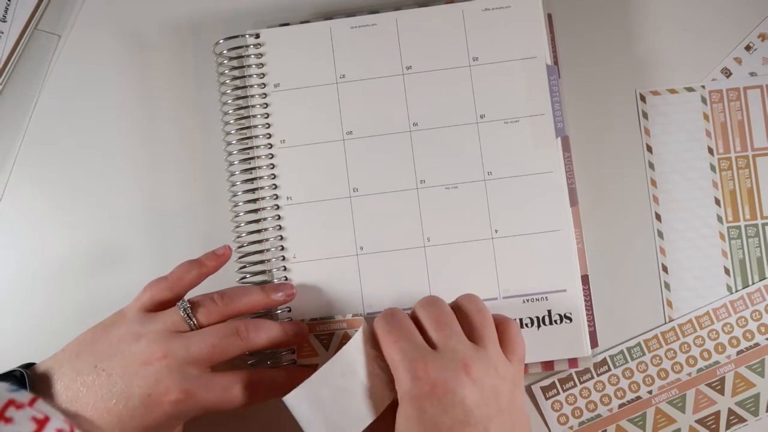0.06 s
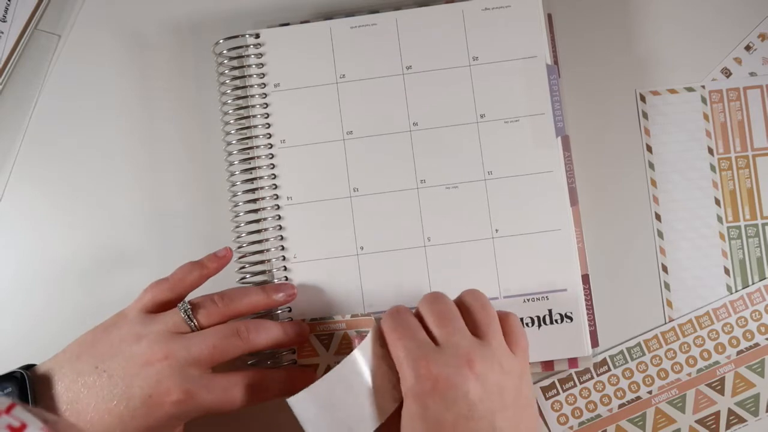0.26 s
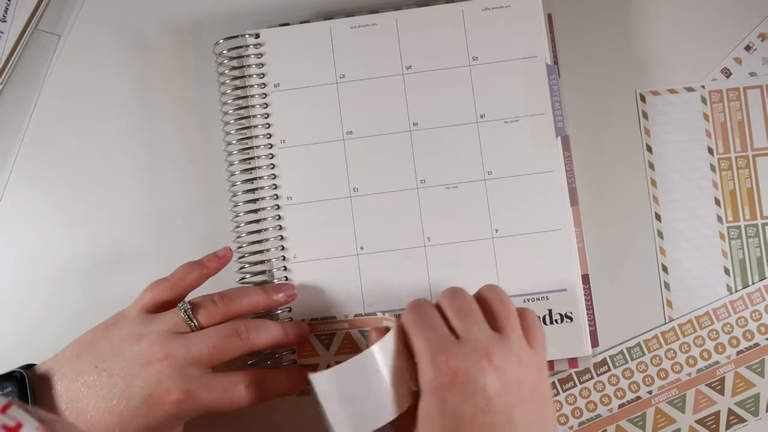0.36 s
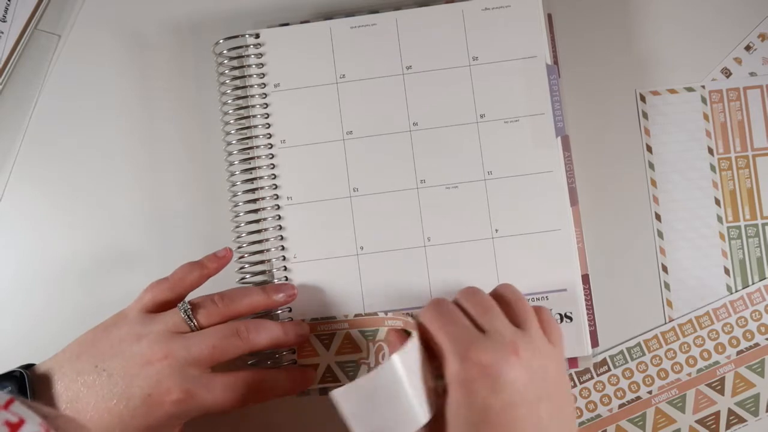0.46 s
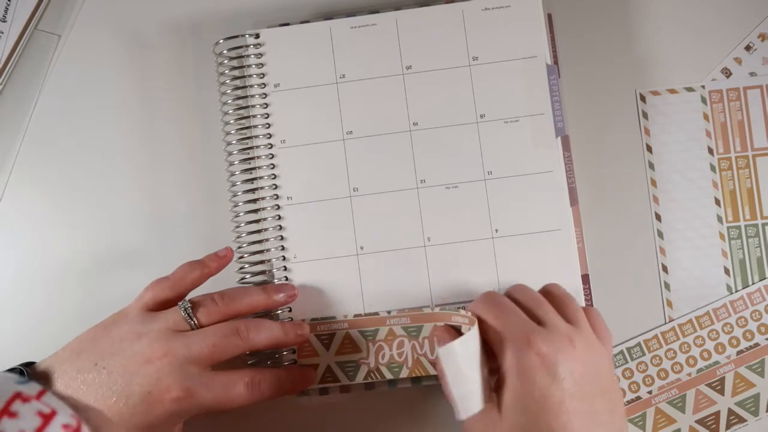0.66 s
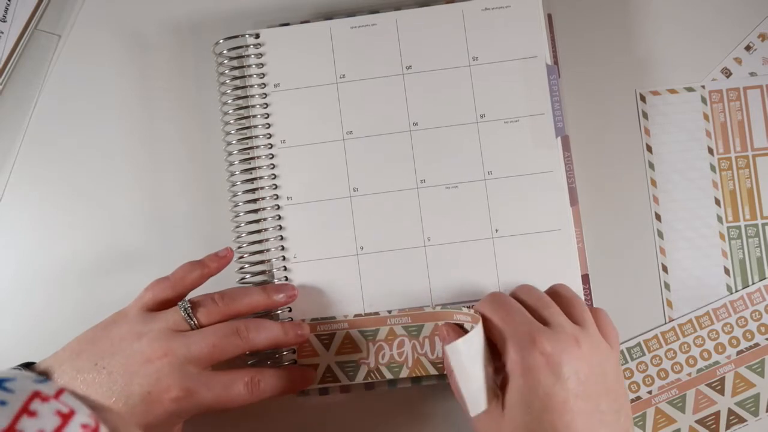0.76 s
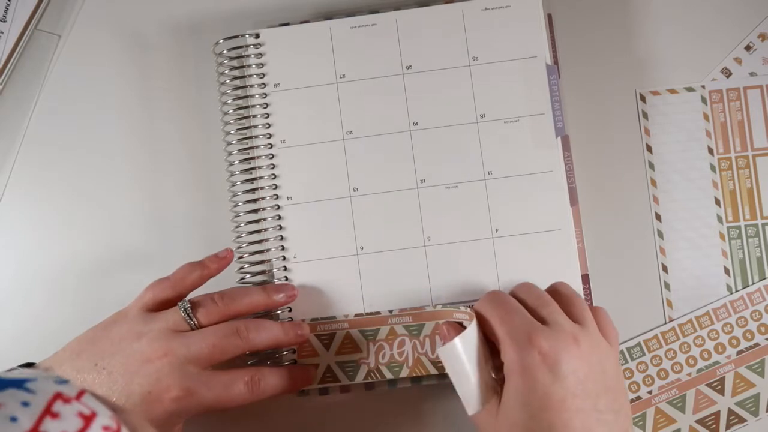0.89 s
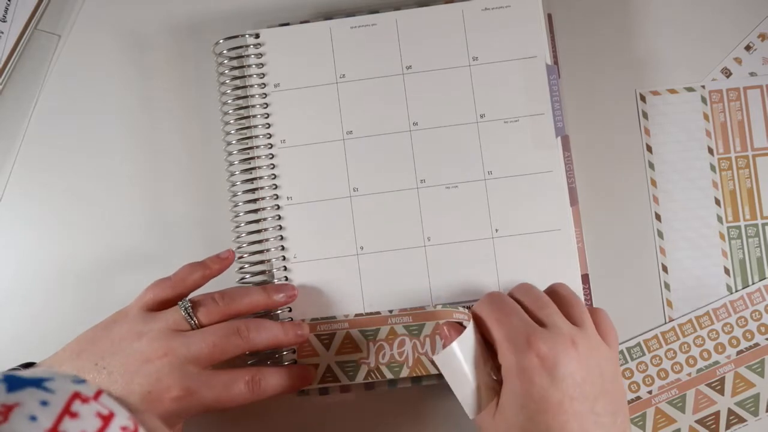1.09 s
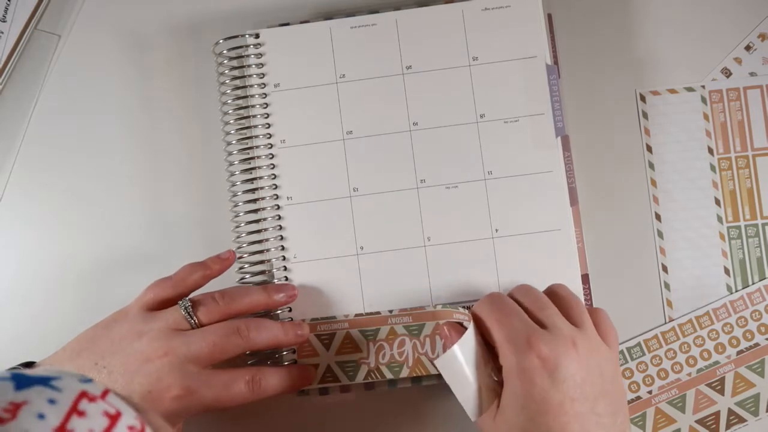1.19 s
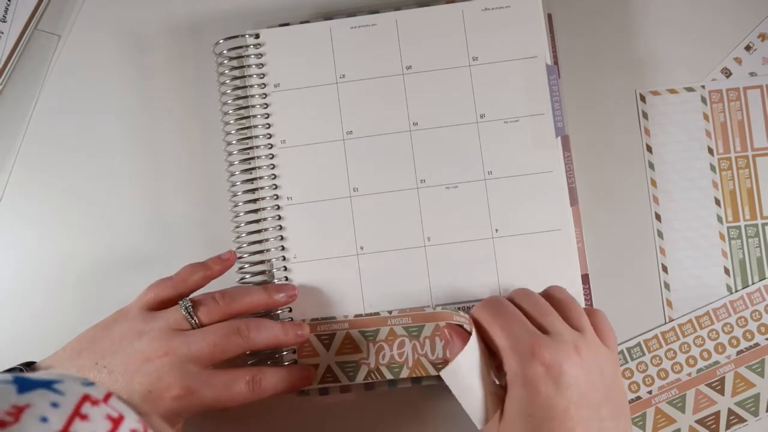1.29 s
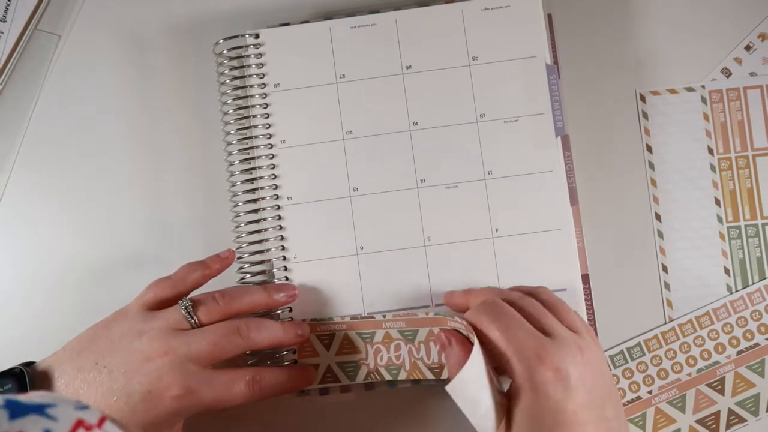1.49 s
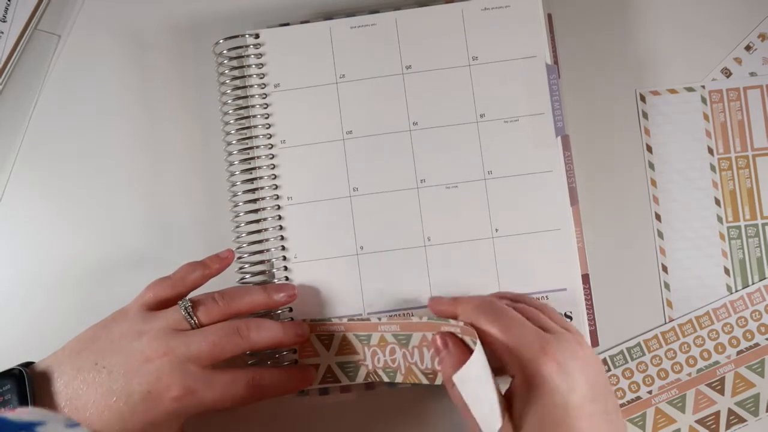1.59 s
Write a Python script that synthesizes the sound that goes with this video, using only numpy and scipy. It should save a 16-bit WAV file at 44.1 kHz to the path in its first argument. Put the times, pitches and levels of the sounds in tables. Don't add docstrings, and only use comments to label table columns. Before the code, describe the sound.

One loud, crisp snap of a stiff paper liner peeling off a sticker, followed by small glue ticks, a faint crackle and soft fingers sliding on a page, close stereo microphone, quiet room with low air noise.

```python
import sys
import numpy as np
from scipy import signal
from scipy.fft import rfft, irfft
from scipy.io import wavfile

SR = 44100
rng = np.random.default_rng(int(sys.argv[2]) if len(sys.argv) > 2 else 0)


def digitize_waveform(pressure):
    field = np.atleast_2d(pressure).T
    bounded = np.clip(field, -1, 1)
    quanta = np.round(bounded * 32767).astype(np.int16)
    wavfile.write(sys.argv[1], SR, quanta)


def voltage_ratio(decibels):
    exponent = np.asarray(decibels, float) / 20
    return 10 ** exponent


N = 72765


def rms_one(x):
    return x / np.sqrt(np.mean(x ** 2) + 1e-20)


def at_hz(points, hz):
    table_hz, value = np.array(points).T
    return np.interp(np.log(hz), np.log(table_hz), value)


def drift(rate_hz):
    hop = 40
    pole = np.exp(-2 * np.pi * rate_hz * hop / SR)
    noise = rng.standard_normal(N // hop + 2002)
    slow = signal.lfilter([1], [1, -2 * pole, pole * pole], noise)[2000:]
    return np.interp(np.arange(N) / hop, np.arange(len(slow)), rms_one(slow))


def band(x, low_hz, high_hz):
    edges_hz = [low_hz, min(high_hz, .45 * SR)]
    sos = signal.butter(2, edges_hz, "band", fs=SR, output="sos")
    return rms_one(signal.sosfilt(sos, x))


def pair(mid, side, alike):
    alike = np.clip(alike, -.997, .997)
    return np.sqrt((1 + alike) / 2) * mid + np.sqrt((1 - alike) / 2) * side * [[1], [-1]]


def air():
    # hz, level_db (per Hz)
    air_spectrum = [(22, -8), (80, -2), (130, -3), (320, -4), (600, -12), (2100, -19.5), (13000, -36.5),
                    (15700, -53)]
    # hz, likeness (-1..1)
    correlation = [(25, .997), (60, .99), (90, .9), (135, .45), (250, -.15), (500, -.2), (1500, .3),
                   (4000, .2), (12000, -.25)]
    # hz, level_db
    mains = [(59.5, -64), (119.6, -64.5)]
    noise = 0
    edges_hz = 18 * 2 ** np.arange(0, 10.1, .5)
    settle = 8000
    white = rng.standard_normal((2, 2, N + settle))
    for k, (low, high) in enumerate(zip(edges_hz, edges_hz[1:])):
        sos = signal.butter(2, [low, high], "band", fs=SR, output="sos")
        mid, side = signal.sosfilt(sos, white[k % 2])[:, settle:]
        hz = np.sqrt(low * high)
        level = voltage_ratio(at_hz(air_spectrum, hz) + .8 * drift(6))
        noise = noise + level * pair(mid, side, at_hz(correlation, hz))
    t = np.arange(N) / SR
    hum = np.zeros(N)
    for k, (hz, level_db) in enumerate(mains):
        hum += voltage_ratio(level_db + 3.5 + 1.5 * drift(5)) * np.sin(2 * np.pi * hz * t + k)
    whine_hz, width_hz = 13020, 20
    whine = band(white[0, :, :N], whine_hz - width_hz / 2, whine_hz + width_hz / 2)
    return voltage_ratio(-53) * rms_one(noise) + hum + voltage_ratio(-82) * whine


def room(x):
    t60_s, wall_cut_hz = .3, 6000
    out = np.zeros((2, N))
    dull = np.exp(-2 * np.pi * wall_cut_hz / SR)
    lags = (rng.uniform(.009, .035, 16) * SR).astype(int)
    for k, lag in enumerate(lags):
        loop, state = x.copy(), [0.]
        gain = voltage_ratio(-60 * lag / SR / t60_s)
        for i in range(lag, N, lag):
            back, state = signal.lfilter([gain * (1 - dull)], [1, -dull], loop[i - lag:i], zi=state)
            loop[i:i + lag] += back[:N - i]
        out[k % 2] += (loop - x) * (-1) ** (k // 2)
    return out


def widen(mid, side):
    # hz, level_db
    side_width = [(110, -12), (380, 0), (700, -3), (1290, -9), (2380, -12), (4400, -7), (8100, 0),
                  (15000, 2)]
    hz = np.fft.rfftfreq(N, 1 / SR) + 1
    side = irfft(rfft(side) * voltage_ratio(at_hz(side_width, hz)) * 1j, N)
    return mid + side * [[1], [-1]]


def rustle(strokes, octaves, grains_per_s, spread_db):
    t, out = np.arange(N) / SR, np.zeros((2, N))
    sizes_db = spread_db * np.minimum(rng.exponential(1, (2, N)), 4)
    sizes = voltage_ratio(sizes_db) * rng.choice([-1, 1], (2, N))
    grains = sizes * (rng.random((2, N)) < grains_per_s / SR)
    flutter_db = 1.5 * drift(60)
    for k, (peak_s, rise_s, fall_s, level_db, hz) in enumerate(strokes):
        swell = np.abs((peak_s - t) / rise_s) ** 1.5
        loss = np.where(t < peak_s, swell, (t - peak_s) / fall_s)
        shape = voltage_ratio(level_db - 10 * np.minimum(loss, 12) + flutter_db)
        shifted = np.roll(grains, k * N // len(strokes), axis=1)
        out += shape * band(shifted, hz * 2 ** (-octaves / 2), hz * 2 ** (octaves / 2))
    return out


def finger_slides():
    # peak_s, rise_s, fall_s (per 10 dB), level_db, centre_hz
    slides = [(1.393, .035, .04, -57, 2800), (1.425, .075, .045, -51, 2150), (1.414, .045, .035, -56, 980),
              (1.546, .009, .045, -52, 400), (1.545, .006, .025, -56, 2450), (1.546, .008, .06, -55, 750),
              (1.585, .06, .04, -58, 2300), (1.648, .035, .06, -55, 2350), (1.647, .025, .06, -54, 880),
              (.63, .05, .08, -57.5, 850), (.256, .008, .024, -52, 140), (1.135, .031, .045, -58, 225),
              (1.64, .04, .06, -56, 320)]
    return rustle(slides, octaves=.8, grains_per_s=14000, spread_db=2.5)


def paper_hiss():
    # peak_s, rise_s, fall_s (per 10 dB), level_db, centre_hz
    hisses = [(.016, .031, .1, -64, 9000), (.2505, .005, .011, -46, 10500), (.271, .007, .018, -44.5, 8400),
              (.3, .02, .05, -59, 10000), (.598, .025, .045, -67, 7900), (1.189, .011, .021, -69, 9100),
              (1.415, .12, .05, -61.5, 7200), (1.61, .12, .12, -68, 10000), (.1, .06, .12, -68, 7000)]
    return rustle(hisses, octaves=1.3, grains_per_s=16000, spread_db=2.5)


def liner_pulls():
    # peak_s, rise_s, fall_s (per 10 dB), level_db, centre_hz
    pulls = [(.04, .06, .15, -60.5, 2900), (.2462, .009, .0045, -51, 4800),
             (.2715, .008, .011, -28.5, 2800), (.292, .013, .045, -42, 3000), (.34, .031, .09, -55, 3000),
             (.59, .025, .028, -54, 2800), (.612, .007, .07, -52.5, 3100), (1.184, .024, .022, -58, 2300),
             (.5, .08, .1, -65, 4500)]
    return rustle(pulls, octaves=1.3, grains_per_s=9000, spread_db=3.5)


def flick(s, level_db, hz, cycles):
    t = np.arange(N) / SR - s
    bell = np.exp(-np.minimum((2 * t * hz / cycles) ** 2, 50))
    return voltage_ratio(level_db) * np.cos(2 * np.pi * hz * t) * bell


def sharp_ticks():
    # start_s (of the peak), level_db, pitch_hz,
    # cycles
    ticks = [(.018, -45, 11500, 6.0), (.058, -44.5, 2100, 1.6), (.145, -47, 8000, 1.6),
             (.2385, -48, 8500, 4.0), (.3168, -37, 1050, 1.6), (.3529, -35, 1050, 1.6),
             (.3812, -42.5, 1050, 1.5), (.59, -46, 3720, 30.0), (.622, -44, 3000, 5.0),
             (.828, -49.5, 2000, 1.6), (.6055, -45, 9000, 2.5), (.609, -41, 3400, 1.5),
             (1.19, -47.5, 3000, 1.2), (1.597, -53, 2060, 28.0), (1.624, -51, 2060, 12.0),
             (1.644, -49, 930, 6.0), (.24862, -19, 9300, 3.0)]
    return sum(flick(*tick) for tick in ticks)


def ring(clicks, hz, t60_s):
    r, w = voltage_ratio(-60 / (t60_s * SR)), 2 * np.pi * hz / SR
    return signal.lfilter([0, np.sin(w)], [1, -2 * r * np.cos(w), r * r], clicks + 1e-18)


def snaps():
    # start_s (of the peak), level_db, pitch_hz, ring_db
    snap_events = [
        (.2485, -5.5, 3800, -13.5),
        (.2546, -21, 4000, -8),
        (.2466, -33, 4400, -12),
        (.6053, -31, 3700, -13),
    ]
    # mode_hz, level_db, t60_s
    modes = [(860, -20, .03), (1270, -12, .014), (1700, -5, .016), (1950, -1, .013), (2230, -5, .018),
             (2630, -2, .014), (3110, -2, .016), (4050, 0.5, .014), (4350, -7, .011), (6160, -11, .013),
             (7750, -5, .008), (9950, -9, .0085), (11400, -14, .013), (13300, -17, .014)]
    out = np.zeros(N)
    luck = rng.normal(0, 1, (len(snap_events), len(modes)))
    for (s, level_db, hz, ring_db), row in zip(snap_events, luck):
        out += flick(s, level_db, hz, 1.6)
        click = flick(s + .0003, level_db + ring_db - 8, 0.01, 6e-7)
        for k, ((mode_hz, mode_db, t60_s), z) in enumerate(zip(modes, row)):
            out += voltage_ratio(mode_db + 2.5 * z) * (-1) ** k * ring(click, mode_hz, t60_s)
    return out


def scene():
    background = air()
    hit_side_db = -4
    hits = (snaps() + sharp_ticks()) * voltage_ratio(np.array([[0], [hit_side_db]]))
    mid, side = hits + liner_pulls() + finger_slides() + paper_hiss()
    pan_db = -1.1
    paper = widen(mid, side) * voltage_ratio(np.array([[pan_db / 2], [-pan_db / 2]]))
    echo = voltage_ratio(-21) * room(mid + 1e-12)
    return paper + echo + background


def band_limit(x):
    return signal.sosfilt(signal.butter(12, 15820, fs=SR, output="sos"), x)


def record(dry):
    # start_s, end_s, above_hz
    dropouts = [
        (.305, .35, 6800),
        (.35, .372, 10200),
        (.372, .41, 11500),
    ]
    t, out = np.arange(N) / SR, dry.copy()
    centre = dry.mean(axis=0)
    fade_s = .003
    for start, end, hz in dropouts:
        high_pass = signal.cheby1(10, .1, hz, "high", fs=SR, output="sos")
        treble = signal.sosfiltfilt(high_pass, centre)
        corners_s = [start - fade_s, start + fade_s, end - fade_s, end + fade_s]
        out = out - treble * np.interp(t, corners_s, [0, 1, 1, 0])
    out = signal.sosfilt(signal.butter(6, 15000, fs=SR, output="sos"), out)
    return band_limit(out)


dry = scene()
out = record(dry)
digitize_waveform(out)
```